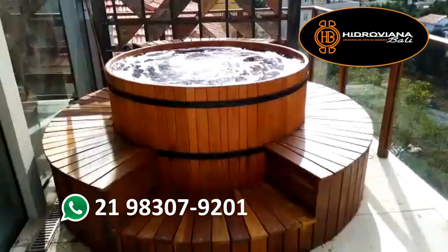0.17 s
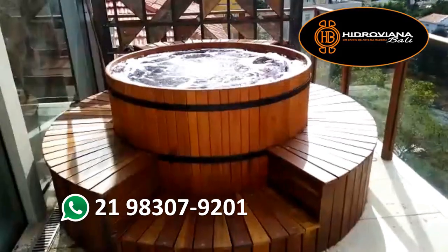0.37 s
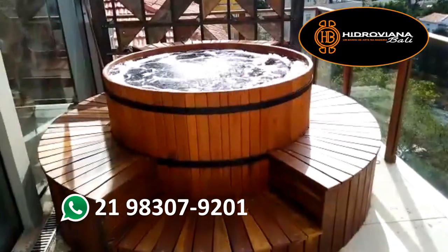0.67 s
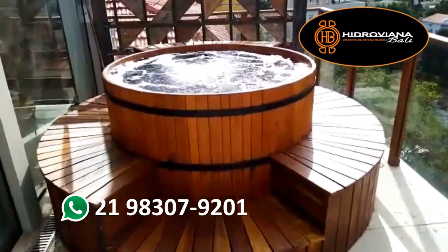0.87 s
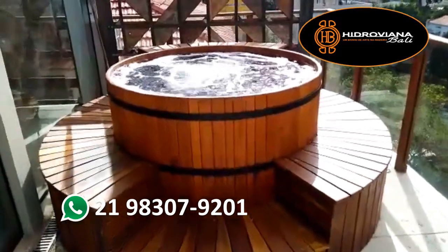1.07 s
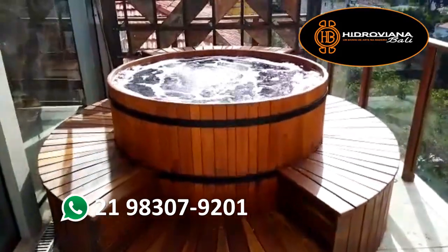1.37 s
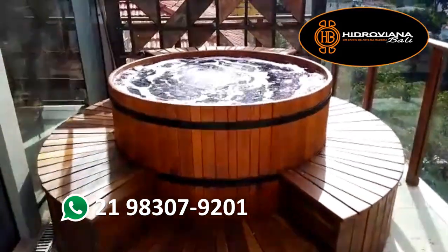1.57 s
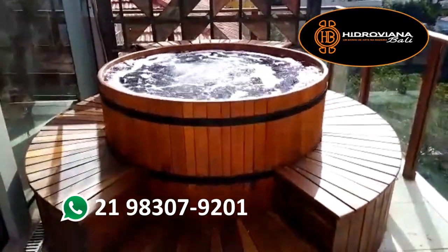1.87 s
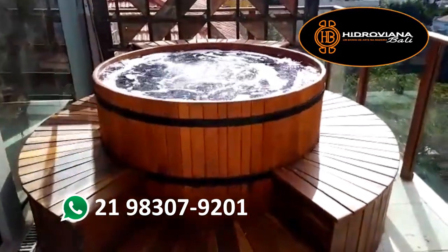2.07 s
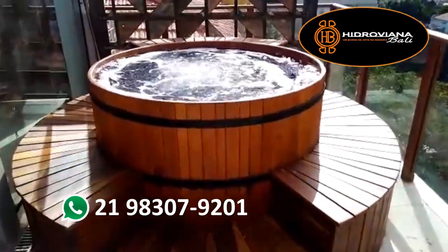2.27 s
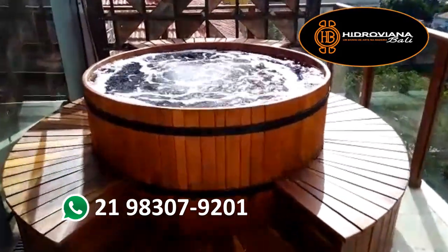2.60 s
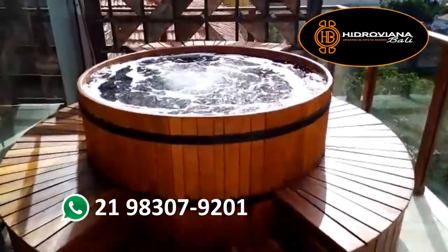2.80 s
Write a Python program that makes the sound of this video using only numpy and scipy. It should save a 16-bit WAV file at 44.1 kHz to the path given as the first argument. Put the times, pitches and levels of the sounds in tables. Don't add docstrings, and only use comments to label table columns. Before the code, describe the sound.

Hot tub jets churning water in a steady low bubbling rush, with light fizz and faint pump whine

```python
import sys
import numpy as np
from scipy import signal
from scipy.fft import rfft, irfft
from scipy.io import wavfile
from scipy.ndimage import uniform_filter1d

SR = 44100
rng = np.random.default_rng(int(sys.argv[2]) if len(sys.argv) > 2 else 0)


def store_pcm(level_fs):
    pcm = np.round(np.clip(level_fs, -1, 1) * 32767).astype(np.int16)
    wavfile.write(sys.argv[1], SR, np.atleast_2d(pcm).T)


def decibels_to_gain(level_db):
    exponent = np.asarray(level_db, float) / 20
    return 10 ** exponent


N = 129654
FRAME, HOP = 1024, 256

# (start_s, churn_db, foam_db); the fizz falls away after 1.7 s
BOIL = [(.1, -1, -1), (.2, -2, 0), (.3, -1.5, 1), (0.399, 0.5, 1.5), (.47, -3.5, -1), (.62, -1.5, -1),
        (.76, -3.5, 1), (.85, -2, -1.5), (1.02, -1, 0.5), (1.3, -2, -2), (1.65, -1, 0), (1.71, -1.5, -6),
        (2.04, -2.5, -9.5), (2.3, -1.5, -7.5), (2.5, -.5, -6), (2.73, -2.5, -10.5), (2.82, -0.5, -5.5),
        (2.94, -1, -11)]
# (pitch_hz, level_db per Hz)
CHURN_COLOUR = [(30, -60), (70, -8.5), (150, 7), (500, -2), (1400, -8.5), (2200, -12), (3900, -20.5),
                (4600, -36)]


def evened(x):
    return x / np.sqrt(np.mean(x ** 2) + 1e-20)


def read(points, hz):
    point_hz, value = np.transpose(points)
    return np.interp(np.log(hz + 1), np.log(point_hz + 1), value)


def patches(frames, wide, long):
    field = rng.standard_normal((frames, FRAME // 2 + 1)).T
    widened = uniform_filter1d(field, wide, 0)
    return evened(uniform_filter1d(widened, long, 1))


def splash_lift_db(t, hz):
    # (middle_s, lift_db, length_s, pitch_hz)
    splashes = [(0.416, 8, 0.04, 3760), (0.502, 11, 0.039, 3550), (0.846, 7.5, 0.15, 3500),
                (1.04, 8, 0.013, 3670), (1.285, 3.5, 0.22, 3500), (1.492, 7.5, 0.067, 3500),
                (1.71, -5.5, 0.11, 3900), (2.014, 5.5, 0.038, 1810), (2.537, 2, 0.028, 3100),
                (2.55, 4, 0.027, 1110), (2.83, 3.5, 0.025, 3500), (2.932, 9.5, 0.021, 3440),
                (0.403, 2, 0.13, 216), (0.125, -3.5, 0.1, 188), (0.994, 4.5, 0.16, 226),
                (2.145, -2, 0.054, 215), (2.864, 4, 0.11, 205), (2.012, 6, 0.027, 940)]
    # (middle_s, lift_db, length_s, pitch_hz)
    rings = [(0.78, 6, 0.66, 1973), (1.37, 4.5, 0.36, 1880), (1.36, 4, 0.14, 1990), (1.97, 4.5, 0.12, 1850),
             (2.67, 8, 0.26, 1980), (2.75, 7, .4, 2100), (2.7, 3, 0.19, 3100), (2.88, 8, 0.12, 2980),
             (0.72, 4, .3, 9600), (2.6, -11, 0.2, 3500), (1.3, 3, 0.23, 3200), (2.93, 14, .06, 7400),
             (0.87, -17, 0.1, 2280), (.55, -10, 0.094, 2850), (1.86, 5, 0.28, 990), (2.7, 8.5, 0.34, 930),
             (1.5, 6, 0.32, 1035), (0.69, 6, 0.34, 700), (2.52, 3, 0.42, 540), (1.75, 3.5, 0.21, 570),
             (1.03, 2.5, 0.085, 570), (2.57, 4.5, 0.28, 1047), (1.2, 3, 0.2, 1260), (1.8, 0.5, 0.22, 1420),
             (2.4, -5, 0.18, 730), (2.7, 3, 0.12, 1250), (2.24, 7, 0.15, 2100), (1.47, 4, 0.47, 1560)]
    splash_octaves, ring_width_hz = 0.22, 39.5
    lift = 0
    for middle_s, db, length_s, pitch_hz in splashes:
        time_off = 2 * (t - middle_s) / length_s
        pitch_off = np.log2((hz + 1) / pitch_hz) / splash_octaves
        lift = lift + db * np.exp(-time_off ** 2 / 2 - pitch_off ** 2 / 2)
    for middle_s, db, length_s, pitch_hz in rings:
        time_off = 2 * (t - middle_s) / length_s
        pitch_off = (hz - pitch_hz) / ring_width_hz
        lift = lift + db * np.exp(-time_off ** 2 / 2 - pitch_off ** 2 / 2)
    return lift


def rush(colour, start_s, level_db, patchy_db, streak_db, flicker_db, splash_share, tilt=0, roll_db=0):
    frames = N // HOP + 5
    hz = np.fft.rfftfreq(FRAME, 1 / SR)[:, None]
    t = np.arange(frames) * HOP / SR
    field = read(colour, hz) + np.interp(t, start_s, level_db) * ((hz + 1) / 8000) ** tilt
    field += patchy_db * patches(frames, wide=14, long=14)
    field += streak_db * patches(frames, wide=2, long=40)
    field += flicker_db * patches(frames, wide=150, long=6)
    field -= roll_db * np.log2(np.maximum(hz / 4700, 1))
    field += splash_share * splash_lift_db(t, hz)
    a, b, c, d = rng.standard_normal((frames, FRAME // 2 + 1, 4)).T
    noise = np.array([a + 1j * b, c + 1j * d]) * decibels_to_gain(field)
    return evened(signal.istft(noise, nperseg=FRAME, noverlap=FRAME - HOP)[1][:, :N])


def churn():
    start_s, churn_db, _ = np.transpose(BOIL)
    return decibels_to_gain(-30) * rush(CHURN_COLOUR, start_s, churn_db, patchy_db=0.14, streak_db=1.5,
                           flicker_db=0.02, splash_share=1.0, roll_db=2.0)


def foam():
    # (pitch_hz, level_db per Hz)
    foam_colour = [(1500, -17), (4000, 3.5), (4900, -9.5), (6300, 0.5), (8500, 4), (11000, -1),
                   (14900, -8.5), (15500, -24)]
    start_s, _, foam_db = np.transpose(BOIL)
    return decibels_to_gain(-49.5) * rush(foam_colour, start_s, foam_db, patchy_db=0.53, streak_db=1.5,
                             flicker_db=0.98, splash_share=1.0, tilt=0.21)


def bubbles():
    per_s, cycles, rise, spread_db = 2600, 10, 0.17, 1
    bursts = rng.random((2, N)) < per_s / SR
    size = decibels_to_gain(spread_db * np.minimum(rng.exponential(1, (2, N)), 5)) * bursts
    kind = rng.integers(0, 30, (2, N))
    t = np.arange(3000) / SR
    out = np.zeros((2, N))
    for k, hz in enumerate(np.geomspace(180, 4200, num=30)):
        turns = hz * t
        ring = np.sin(2 * np.pi * turns * (1 + rise * turns / cycles))
        ring *= np.minimum(turns, 1) * decibels_to_gain(-40 * turns / cycles)
        ring = decibels_to_gain(read(CHURN_COLOUR, hz)) * hz * ring
        out += signal.oaconvolve(size * (kind == k), ring[None], axes=1)[:, :N]
    start_s, churn_db, _ = np.transpose(BOIL)
    swell = decibels_to_gain(np.interp(np.arange(N) / SR, start_s, churn_db))
    return decibels_to_gain(-36) * evened(out) * swell


def body_db(hz):
    # (pitch_hz, width_hz, lift_db)
    body = [(215, 140, 3.5), (390, 152, -4.5), (588, 430, 3), (1275, 180, 5), (1695, 550, -3),
            (1913, 188, 5), (2330, 84, -3.5), (2478, 175, 6.5), (2892, 95, -6.5), (2986, 60, 3.5),
            (3250, 58, -13), (3500, 150, 2.5), (3950, 110, 2), (4640, 175, -4)]
    return sum(db / (1 + (2 * (hz - pitch_hz) / width_hz) ** 2) for pitch_hz, width_hz, db in body)


def balcony():
    fade_60db_s, echo_db, echoes_per_s = 0.3, -13, 1500
    t = np.arange(8000) / SR
    echoes = (rng.random(len(t)) < echoes_per_s / SR) * rng.standard_normal(len(t))
    echoes *= decibels_to_gain(-60 * t / fade_60db_s) * (t > .002)
    return (t == 0) + decibels_to_gain(echo_db) * echoes / np.linalg.norm(echoes)


def pump():
    tone_hz = [213, 233, 350, 650, 932, 1051, 1318, 1343, 1463, 1667]
    # (level_db, waver_hz)
    tones = [(-43.5, 4.9), (-41, 3.7), (-49, 4.05), (-48.5, 5.5), (-51.5, 8.17), (-51, 7.64), (-49.5, 6),
             (-48, 1.47), (-51.5, 1.34), (-57, 3.7)]
    out = np.zeros((2, N))
    for hz, (db, waver_hz) in zip(tone_hz, tones):
        slow = uniform_filter1d(rng.standard_normal(N), 6000)
        drift = evened(uniform_filter1d(slow, 6000))
        turns = np.cumsum(hz + waver_hz * drift) / SR + rng.random((2, 1))
        out += np.sqrt(2) * decibels_to_gain(db) * np.sin(2 * np.pi * turns)
    return out


def at_ports(a, b):
    # (pitch_hz, likeness from 0 to 1)
    likeness = [(60, 0.73), (200, 0.94), (400, 0.67), (900, 0.68), (1600, 0.069), (3000, 0.03),
                (8000, 0.042)]
    # (pitch_hz, left_minus_right_db)
    lean_db = [(60, -1), (250, 0.5), (900, 0), (1700, -16), (2500, -10), (4000, -7), (9000, -3),
               (15000, -6.5)]
    hz = np.fft.rfftfreq(N, 1 / SR)
    same, lean = np.clip(read(likeness, hz), 0, 1), decibels_to_gain(read(lean_db, hz) / 2)
    right = same * a + np.sqrt(1 - same ** 2) * b
    return irfft(np.array([a * lean, right / lean]), N)


def scene():
    water = churn() + foam() + bubbles()
    hz = np.fft.rfftfreq(N, 1 / SR)
    a, b = rfft(water) * decibels_to_gain(body_db(hz)) * rfft(balcony(), N) + rfft(pump())
    return at_ports(a, b)


def denoise(x):
    contrast = .22
    z = signal.stft(x, nperseg=FRAME, noverlap=FRAME - HOP)[2]
    power = uniform_filter1d((abs(z) ** 2).mean(0), size=3, axis=1) + 1e-20
    around = uniform_filter1d(power, size=15, axis=0)
    around = abs(uniform_filter1d(around, size=40, axis=1)) + 1e-20
    z = z * (power / around) ** (contrast / 2)
    return signal.istft(z, nperseg=FRAME, noverlap=FRAME - HOP)[1][:, :N]


def widen(x):
    # (pitch_hz, share)
    across = [(100, 0.47), (1200, 0.55), (2500, 0.65), (4800, 0.59), (6100, 0.33), (8600, 0.27),
              (11000, 0.17), (14500, 0.25)]
    # (pitch_hz, lag in radians)
    across_turn = [(9800, 0), (11600, -1), (15000, -2.5)]
    low_cut_hz, delay_s = 35, 0.0004092
    hz = np.fft.rfftfreq(N, 1 / SR)
    z = rfft(x) / np.sqrt(1 + (low_cut_hz / (hz + 1)) ** 4)
    share = np.clip(read(across, hz), -.98, .98)
    lag = 2 * np.pi * hz * delay_s + read(across_turn, hz)
    return irfft((z - share * np.exp(-1j * lag) * z[::-1]) / np.sqrt(1 + share ** 2), N)


def hush():
    # (pitch_hz, level_db per Hz)
    hush_colour = [(3500, -20), (4300, -2), (4700, 0), (5300, 0), (6200, -8), (8000, -18), (15000, -30)]
    # (start_s, level_db)
    gusts = [(.08, 14), (.18, 10), (.24, -12), (.76, -12), (.82, 6), (.88, -12), (1.11, -10), (1.18, 5),
             (1.26, -9), (1.94, -7), (2.08, 4), (2.29, 3), (2.34, -9), (2.46, -9), (2.55, 3), (2.77, 5),
             (2.82, -10), (2.94, -10)]
    start_s, gust_db = np.transpose(gusts)
    return decibels_to_gain(-60) * rush(hush_colour, start_s, gust_db, patchy_db=0.0, streak_db=4.5,
                           flicker_db=1.5, splash_share=0)


def fade_in():
    open_s, rise_s, fade_s, first_level, bend = 0.077, .002, 0.32, 0.072, 0.89
    since_open_s = np.arange(N) / SR - open_s
    opening = np.clip(since_open_s / rise_s, 0, 1)
    swell = np.clip(since_open_s / fade_s, 0, 1) ** bend
    return opening * (first_level + (1 - first_level) * swell)


def band_limit(x):
    return signal.sosfilt(signal.butter(12, 15490, fs=SR, output="sos"), x)


def record(dry):
    wide = widen(denoise(dry)) + hush()
    return band_limit(wide * fade_in())


dry = scene()
out = record(dry)
store_pcm(out)
```